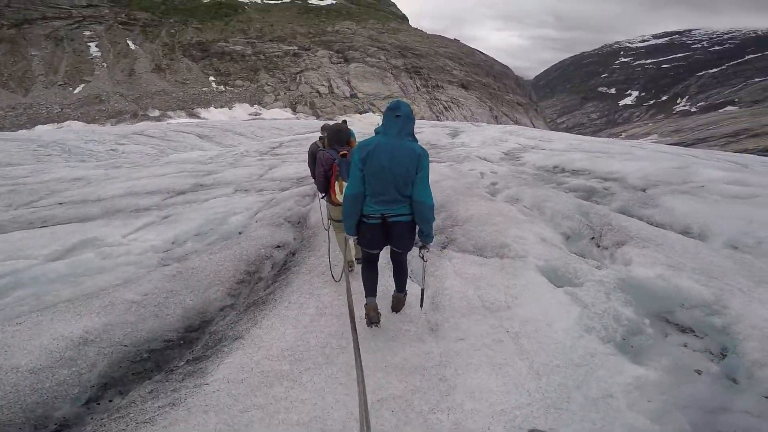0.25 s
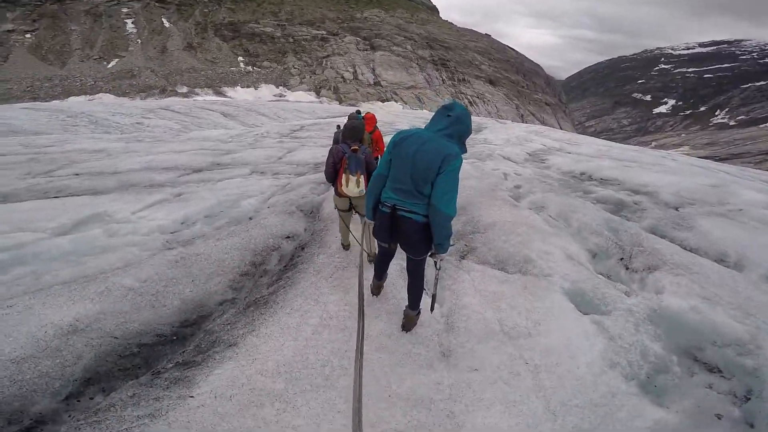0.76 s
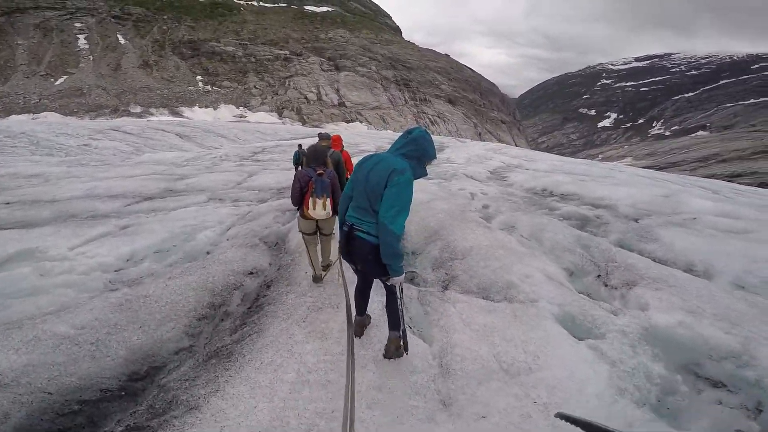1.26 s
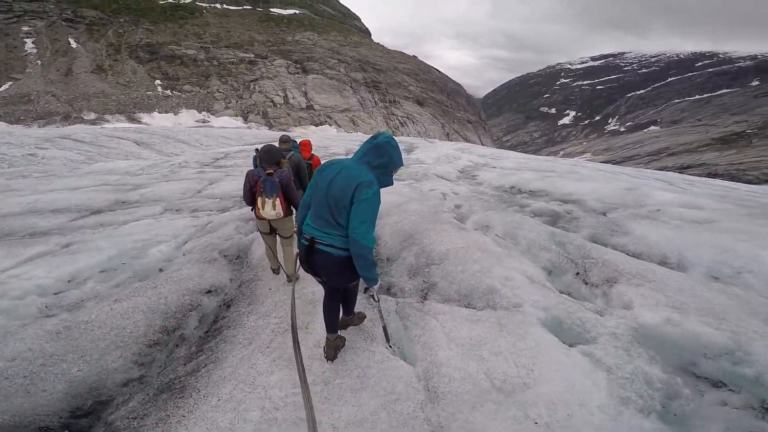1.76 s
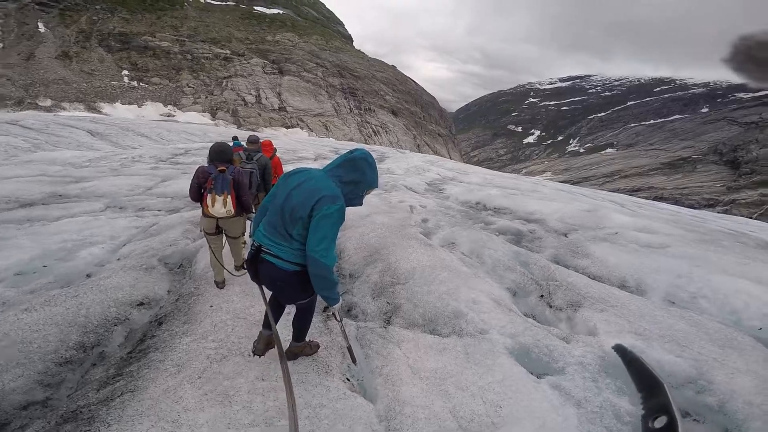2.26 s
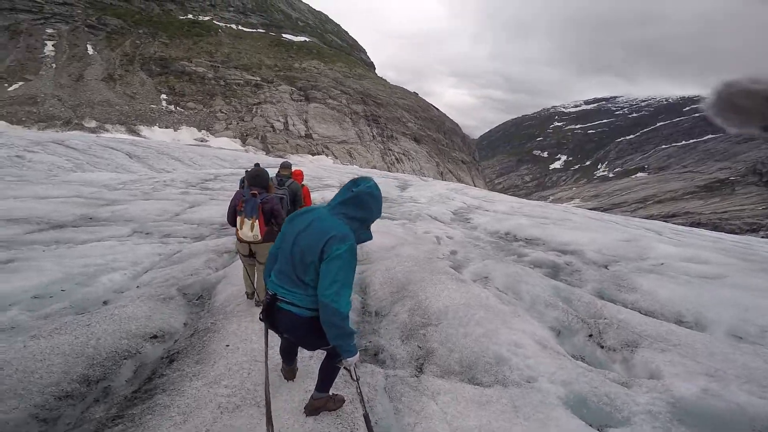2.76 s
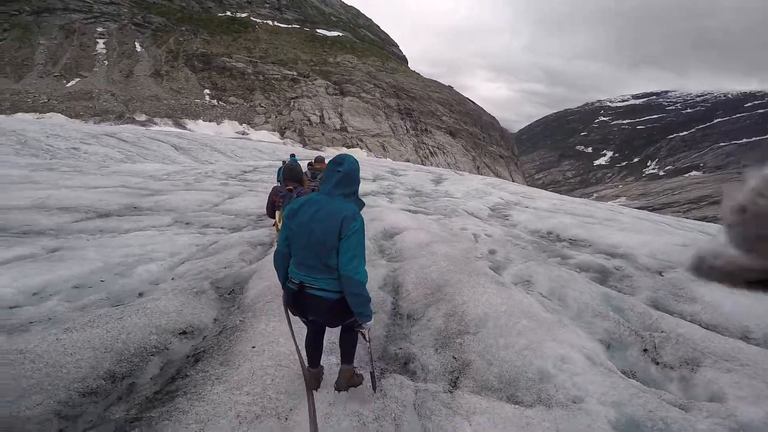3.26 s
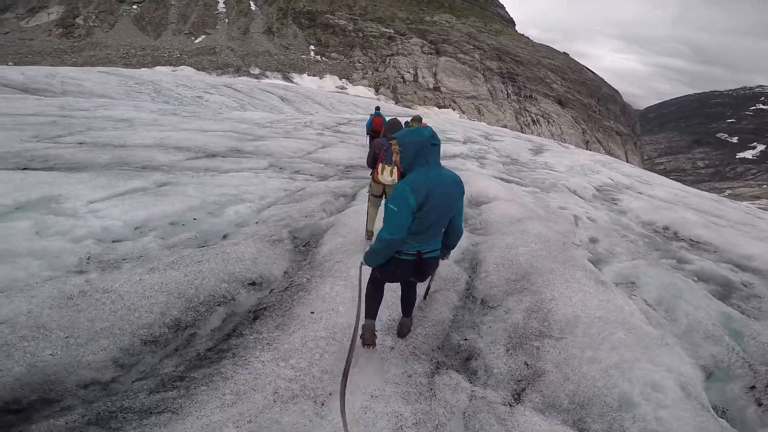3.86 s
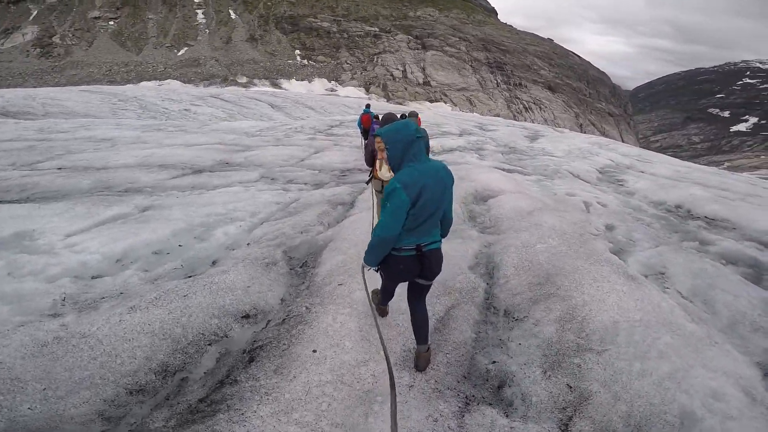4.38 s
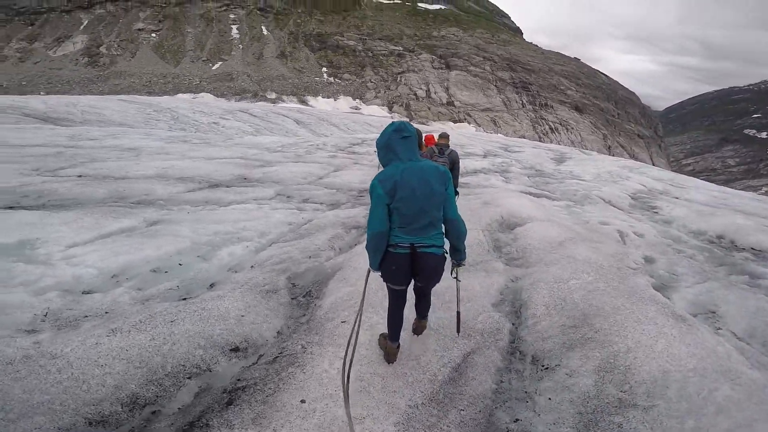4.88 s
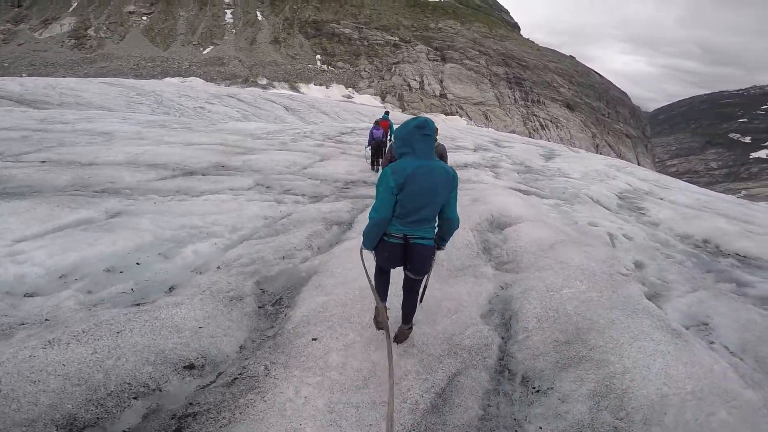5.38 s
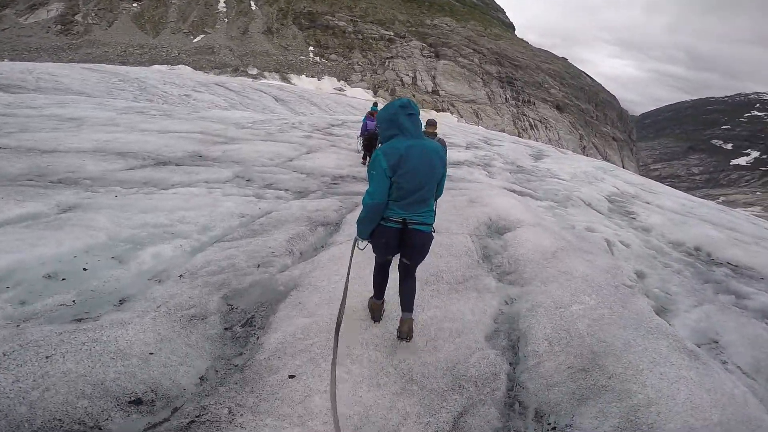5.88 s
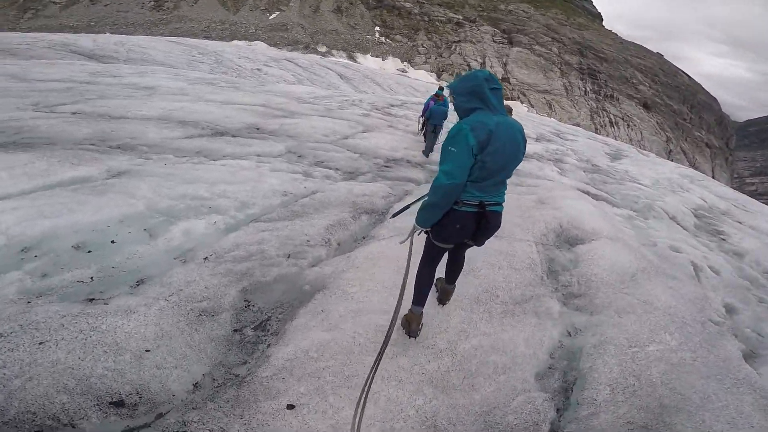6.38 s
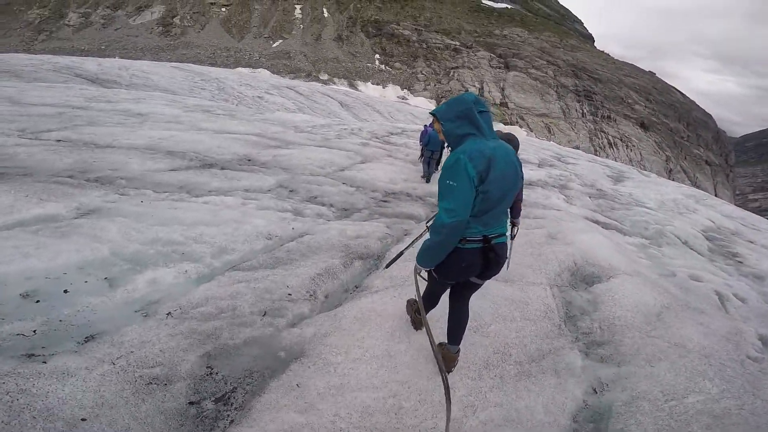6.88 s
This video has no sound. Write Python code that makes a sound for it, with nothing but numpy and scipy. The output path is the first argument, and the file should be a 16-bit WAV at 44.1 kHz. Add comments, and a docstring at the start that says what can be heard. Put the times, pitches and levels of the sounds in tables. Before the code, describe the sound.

A close, dry, single-channel sound on an open glacier, slightly muffled by a body-worn camera housing. From 0 to 1.8 s spiked boots bite bare ice in short, irregular, gritty crunches with tiny glassy snaps; a sharp click with a faint steel clink comes at 0.4 s, and a brief rub at 0.6. From 1.7 s a glove rubs the plastic, taps it at 1.83, and hits it at 2.07 with a very loud, distorted knock and low jolt, another tap following at 2.12. Hollow rubbing surges until about 2.7, fades, then flares with taps around 3.25. A faint rough squeak rises near 3.8. Uneven crunching continues to 7.1 s, with brighter snaps around 5.6 to 5.7 and thin steel scrapes around 4.8 and 6. Underneath lie soft wind buffets, small strap thuds, the uneven hiss of distant steps and dragging rope, and a barely audible high whine.

```python
"""Crampons on glacier ice

A roped party walks over bare ice, heard through the housing of a body-worn camera.
Spike bites are bursts of shaped noise grains with short decaying sines as crystal snaps.
A glove rubs (noise through resonances) and taps (damped sines), once hard enough to clip; straps
jolt the microphone (pulses), wind buffets it (low noise), steel clinks (modes) and slides (narrow hiss).
Behind: a brief squeak, the uneven hiss of far walkers and dragging rope, a faint steady whine."""
import sys
import numpy as np
from scipy import signal
from scipy.fft import rfft, irfft, next_fast_len
from scipy.io import wavfile
from scipy.ndimage import uniform_filter1d, map_coordinates

SR = 44100
rng = np.random.default_rng(int(sys.argv[2]) if len(sys.argv) > 2 else 0)


def transcribe(signal):
    """Save signal, clipped to [-1, 1], as a 16-bit WAV file at the path in sys.argv[1]."""
    frames = np.atleast_2d(signal).T
    limited = np.clip(frames, -1, 1)
    pcm = np.round(limited * 32767).astype(np.int16)
    wavfile.write(sys.argv[1], SR, pcm)


N = 314433
TIME_S = np.arange(N) / SR

# spike bites: t/s, length/s, body level/dB, treble over body/dB
BITES = [(0.041, 0.031, -47, -2), (0.11, 0.0081, -54.5, -0.5), (0.13, 0.066, -53.5, -3.5),
         (0.241, 0.071, -52, -6), (0.319, .014, -44.5, -3.5), (0.395, 0.006, -37, -12),
         (0.448, 0.045, -50.5, -8.5), (0.671, 0.013, -53.5, -13), (0.773, 0.057, -58.5, -5),
         (0.855, 0.023, -49.5, -9.5), (0.928, 0.072, -55.5, -7), (1.017, 0.053, -49, -4),
         (1.081, 0.0075, -44.5, -17), (1.128, 0.025, -52.5, -1), (1.159, 0.018, -46, -4.5),
         (1.18, 0.086, -55.5, -2.5), (1.307, 0.024, -56, -1), (1.333, 0.041, -48.5, -2.5),
         (1.655, 0.02, -57.5, -3), (1.684, 0.011, -49, 0), (1.704, 0.09, -57, -2), (1.811, 0.038, -52, 0),
         (2.716, .012, -60, -1), (2.741, .01, -62, 8), (2.993, .012, -60, 8), (3.039, 0.0088, -61, 6),
         (3.365, 0.0074, -57, -2), (3.383, .008, -56, 2), (3.47, 0.013, -61, 6), (3.492, 0.021, -55, 0),
         (3.548, 0.012, -43.5, -6), (3.599, 0.057, -56, -1), (3.664, .028, -46.5, -1.5),
         (3.75, 0.029, -57, 1), (3.819, 0.028, -57, 2), (3.906, 0.023, -54.5, 9), (3.986, 0.11, -55, -3.5),
         (4.133, 0.14, -56.5, -2.5), (4.26, 0.041, -50.5, -1.5), (4.363, 0.12, -55.5, -2.5),
         (4.553, 0.019, -62, 5.5), (4.603, 0.018, -61.5, 6), (4.783, .045, -61, 1),
         (4.834, 0.097, -54, -0.5), (4.967, .013, -49.5, -8.5), (5.056, .11, -58, 2),
         (5.175, 0.024, -53.5, -0.5), (5.28, .012, -56.5, 4.5), (5.513, 0.014, -58, 5.5),
         (5.54, 0.037, -57.5, 5), (5.579, 0.089, -47, -0.5), (5.674, 0.067, -49, -12),
         (5.762, 0.049, -55, 0), (5.889, 0.022, -56, 6), (5.958, 0.038, -53.5, 0), (6.047, 0.07, -55, -6),
         (6.12, 0.1, -55, -1), (6.201, 0.05, -47.5, 0.5), (6.253, 0.15, -64, 0), (6.367, 0.03, -52.5, -2),
         (6.513, 0.035, -62, 10), (6.839, 0.031, -54, 0), (6.878, 0.052, -47, -2.5),
         (6.917, 0.035, -58, -2), (6.954, 0.069, -47, -5.5), (7.029, .037, -54.5, -2),
         (7.074, .025, -61.5, 4), (7.1, 0.022, -58, 4)]
# ice spectra, body and treble: f/Hz, density/dB
ICE_BODY = [(350, -38), (600, -10.5), (729, -16), (861, -7.5), (1060, -1), (1340, -12.5), (1470, -3.5),
            (1740, -14), (1880, -9), (2200, 2.5), (2850, -0.5), (4130, -3.5), (4880, -23), (5500, -7),
            (7150, -48), (12100, -120)]
ICE_TREBLE = [(2350, -68), (4000, -0.5), (4940, 0.5), (5350, -1), (7710, 1.5), (9970, -4.5), (11000, -15.5),
              (12800, -7), (14600, -11), (15600, -9)]
# single crystals snapping: t/s, level/dB, f/Hz
CRYSTAL_SNAPS = [(0.3955, -43, 3030), (0.4833, -36, 2240), (1.054, -33.5, 3010), (1.0819, -36, 3150),
                 (1.1613, -51, 4250), (1.6876, -30, 3070), (3.6674, -32, 2770), (3.9113, -43, 5440),
                 (4.267, -37, 3810), (3.9961, -36.5, 2580), (4.0864, -39, 3870), (4.2385, -39, 2600),
                 (5.595, -32, 2340), (5.6518, -27.5, 4000), (5.7202, -27, 2070), (6.2026, -31, 2460),
                 (6.3133, -38, 2160), (6.5378, -48.5, 4510), (6.7508, -43, 2330), (7.0487, -43, 3650),
                 (7.103, -43, 3480)]
# steel dragged over ice: t/s, length/s, level/dB, ring index 0-2
STEEL_SLIDES = [(0.574, 0.17, -63, 0), (0.57, 0.073, -64, 2), (4.83, 0.23, -60, 0), (4.7, 0.36, -62, 2),
                (5.75, 0.1, -60, 0), (5.75, 0.23, -68, 2), (5.95, 0.34, -61.5, 0), (5.9, .35, -61, 1),
                (5.95, 0.2, -54, 2), (6.52, 0.35, -65, 0), (6.7, .16, -64.5, 2)]
# rings of dragged steel: f/Hz, width/Hz
SLIDE_RINGS = [(2230, 320), (2880, 330), (3860, 250)]

# glove strokes, one table a stroke: t/s, level/dB, treble over body/dB, lower share/dB, highest share/dB
GLOVE_STROKES = [
    [(0.568, -60, -4, -3, -3), (0.582, -45.5, -18, 0, -14), (0.596, -56, -8, -2, -9)],
    [(1.7, -56, 0, -1, -6), (1.708, -52, -2, -9, -2), (1.744, -51, -6, -2, -7), (1.77, -46, -8, -5, -3),
     (1.79, -56, -4, -1, -7), (1.8, -56, -2, -5, -1)],
    [(1.836, -40, -3, -7, -3), (1.844, -37.5, -6, -7, -13), (1.882, -24, -6, -3.5, -18),
     (1.91, -35, -12, -4.5, -5.5), (1.922, -32, -17, -3, -8), (1.942, -31, -15, -2.5, -23),
     (1.96, -52, -11, -3, -12)],
    [(1.96, -49, -8, 1, -14), (1.982, -48, -3, -4, -10), (1.994, -41, -13, -5, -17),
     (2.012, -32.5, -10, 0, -11), (2.026, -45, -10, -1, -13), (2.04, -44, -7, -5, -11),
     (2.058, -52, -14, -3, -11)],
    [(2.08, -37, -13, -1, -16), (2.116, -28, -13, -6, -10), (2.124, -18, -12, -4, -10),
     (2.138, -23, -15, -9, -13), (2.2, -25, -14, -8, -11), (2.326, -32, -10, -1.5, -8),
     (2.385, -45, -4, -8, -3)],
    [(2.385, -45, -11, -3, 1.5), (2.411, -34, -20, -4.5, -12), (2.441, -38.5, -16, -3, -8),
     (2.46, -69, -15, -2, -12)],
    [(2.508, -64, -9, -1, -6), (2.528, -39.5, -8, -2, -11), (2.562, -33.5, -6, -6, -4.5),
     (2.592, -37.5, -8, -6.5, -8), (2.662, -32, -7.5, -4, -3), (2.676, -47, -6, -2, -5),
     (2.682, -50, -9, -5, -9)],
    [(2.686, -47, -7, 0, -7), (2.7, -61, -8, -5, -14), (2.724, -50.5, -6, -2, -6), (2.73, -63, -7, -6, -5),
     (2.772, -41, -14, -0.5, -17), (2.81, -59, -6, -6, -6)],
    [(2.81, -60, -6, -8, -6), (2.818, -58, -9, -13, -11), (2.834, -41.5, -16, -0.5, -13),
     (2.852, -57, -2, -12, -11), (2.87, -57, -7, -6, -8)],
    [(2.87, -63, -6, -3, -7), (2.906, -42.5, -13, -12, -9), (2.974, -35, -15.5, -13, -9.5),
     (3.014, -58, 0, -6, -5), (3.05, -60, -3, -9, -8)],
    [(3.1, -56, -10, -8, -10), (3.136, -56, -3, -5, -8), (3.15, -37, -19, -4, -18),
     (3.156, -48, -6, -4, -6), (3.202, -39, -7, -1.5, -9), (3.226, -45, -1, 2, -3),
     (3.228, -35, -12, -5, -9)],
    [(3.234, -27, -24, -7, -9), (3.242, -31, -16, -7, -7), (3.26, -24.5, -14.5, -14, -6),
     (3.286, -27, -11, -17, -6), (3.304, -38, -6, -2, -10), (3.31, -48, -7, 3, -9)],
    [(3.31, -46, -3, 0, -12), (3.344, -49, -9, -0.5, -18), (3.362, -59, -4, -3, -4),
     (3.366, -50, -8, -0.5, -12), (3.436, -58.5, 4.5, 0, -11), (3.48, -49, -7, -8, -10)],
    [(5.712, -47, -10, -4, -13), (5.72, -37.5, -5, -4.5, -15), (5.732, -38.5, -19, 2, -18),
     (5.742, -47, -9, -1, -10)],
]
# glove treble spectrum: f/Hz, density/dB
GLOVE_TREBLE = [(2060, -65), (3500, 9.5), (4610, 5.5), (6080, -5.5), (6350, -1.5), (7150, -6),
                (8260, -13.5), (10500, -13), (11500, -9), (14700, -17), (15600, -16)]
# housing resonances, three groups: f/Hz, width/Hz, level/dB
HOUSING_LOWER = [(1443, 676, -1), (2257, 335, 0.5)]
HOUSING_UPPER = [(2390, 360, -1.2), (2430, 355, 1.7)]
HOUSING_HIGHEST = [(3150, 480, 2), (4250, 1100, -8)]
# taps on the housing: t/s, level/dB, ring f/Hz, contact/ms, crack over tap/dB
HOUSING_TAPS = [(0.3958, -28, 3010, 2.8, -17), (1.8287, -10.5, 2450, 1.56, -27),
                (1.9238, -29, 2160, 1.2, -29), (2.0099, -16.5, 1910, 0.74, -27), (2.0677, -19, 500, 1, -30),
                (2.0691, 15, 2683, 1.2, -6), (2.0699, -12, 2300, 3.6, -9), (2.099, -20, 2500, 0.46, -28.5),
                (2.1234, -30, 2520, 0.74, -23), (2.1247, -4.5, 2480, 0.93, -22),
                (2.829, -35.5, 2520, 1.1, -17), (3.1493, -27, 2460, 1.1, -19), (3.233, -13, 2320, 1.5, -38),
                (3.262, -12.5, 2340, 0.95, -22), (3.302, -21.5, 1700, 0.75, -18)]

# microphone jolts: t/s, level before the low pass/dB, push +1 or pull -1, width/ms
MIC_JOLTS = [(0.0453, -47, -1, 1.8), (0.2305, -27.5, -1, 1.8), (0.3292, -39, -1, 2.7),
             (0.406, -25.5, -1, 1.9), (0.4785, -30.5, -1, 1.2), (0.526, -34, -1, 2.1),
             (0.5823, -38.5, -1, 3.4), (0.9425, -32, -1, 3.6), (1.0055, -36, -1, 2.4), (1.0835, -30, -1, 1),
             (1.376, -35, 1, 4), (1.637, -34, 1, 2.9), (1.8507, -30, 1, 2.3), (2.069, -1, 1, 4.8),
             (2.124, -22, 1, 1.9), (2.3087, -24, 1, 0.79), (2.349, -32, -1, 4.4), (2.5065, -11.5, -1, 6.16),
             (2.8897, -21, -1, 6.2), (3.149, -26.5, -1, 4.8), (3.233, -25, 1, 3.1), (3.277, -27.5, -1, 3.4),
             (3.372, -22, 1, 5), (3.406, -26, 1, 5.6), (3.613, -33, 1, 5.7), (3.6846, -32.5, 1, 1.1),
             (3.943, -34.5, 1, 2.7), (4.432, -33.5, -1, 1.5), (4.5204, -36, 1, 4.2),
             (4.5584, -29.5, -1, 2.4), (4.6643, -32.5, 1, 3.1), (5.14, -33.5, 1, 2), (5.252, -32.5, 1, 2.8),
             (5.3626, -30.5, 1, 3.3), (5.619, -34.5, 1, 1.3), (5.646, -28.5, -1, 1.6),
             (5.695, -32, -1, 3.9), (5.7174, -42, -1, 2.2), (5.935, -35.5, 1, 3.4),
             (5.9888, -32.5, -1, 3.8), (6.2235, -32, 1, 1.4), (6.385, -32, -1, 1), (6.444, -34.5, 1, 3),
             (6.963, -32, 1, 0.92)]
# wind on the port: t/s, sway level/dB
WIND_SWAY = [(0.0, -45), (0.5, -39), (0.83, -49), (1.15, -41), (1.37, -47), (1.49, -39), (1.61, -47),
             (1.81, -41.5), (1.91, -28.5), (2.08, -21), (2.24, -34), (2.46, -43.5), (2.64, -36),
             (2.86, -43.5), (3.2, -32), (3.47, -40.5), (3.61, -32), (3.79, -45), (4.13, -43.5), (4.28, -33),
             (4.4, -43.5), (4.55, -51.5), (4.8, -51.5), (4.96, -33), (5.14, -43.5), (5.4, -55),
             (5.62, -39.5), (5.78, -28), (5.9, -48), (6.31, -38), (6.67, -55), (7.03, -34), (7.13, -46.5)]
# wind spectra, sway and flutter: f/Hz, density/dB
SWAY_SPECTRUM = [(8.8, -36.5), (15, 3.5), (29, -4.5), (36, -5), (54, -12.5), (110, -31.5), (140, -46),
                 (240, -120)]
FLUTTER_SPECTRUM = [(41, -25.5), (70, -0.5), (177, -7.5), (274, -5.5), (400, -7.5), (639, -26.5),
                    (800, -22.5), (1040, -54), (1760, -120)]

# steel gear touching: t/s, then the level/dB of each of four modes
STEEL_CLINKS = [(0.08, -68, -64, -70, -57), (0.3963, -53, -58, -42, -50), (1.15, -77, -67, -70, -44.5),
                (1.66, -70, -73, -52, -50)]
# steel modes: f/Hz, t60/s
STEEL_MODES = [(1674, 0.32), (2234, .3), (3042, 0.1), (4230, 0.15)]
# squeak path: t/s, f/Hz, level/dB
SQUEAK_PATH = [(3.76, 960, -75), (3.8, 1050, -62), (3.86, 1200, -67), (3.9, 1376, -58.5), (3.93, 1450, -75)]
# far walkers and dragging rope: t/s, body level/dB
FAR_LEVEL = [(0.0, -62.5), (0.6, -59.5), (0.79, -63.5), (1.16, -61.5), (1.66, -61), (1.75, -54.5),
             (3.45, -54.5), (3.78, -60), (4.28, -62.5), (4.81, -62.5), (5.29, -59.5), (5.55, -65),
             (5.7, -57), (6.1, -63), (6.33, -60), (7.13, -59.5)]
# far spectra, body and treble: f/Hz, density/dB
FAR_BODY = [(260, -41.5), (450, 0.5), (708, -10.5), (815, -8), (968, -5.5), (1210, -1.5), (1400, -5),
            (2140, -4.5), (2450, -3), (3440, -8), (3810, -5), (5000, -40), (6500, -67), (11000, -120)]
FAR_TREBLE = [(2470, -50.5), (4200, 4.5), (7050, -3), (7740, -3), (8400, -3.5), (11400, -8.5), (13100, -8),
              (14200, -10.5), (15600, -7.5)]
# faint whine, one row: f/Hz, width/Hz, level/dB
WHINE_BAND = (9550, 200, -83)

FIRST_SNAP_DB, SNAP_LOW_HZ, SNAP_HIGH_HZ = 4, 2160, 4360  # snap opening each bite, dB over its body
STRAY_PER_S, STRAY_MAX_DB = 41, -47.5  # faint snaps at random times
REBOUND_DB, REBOUND_DB_PER_MS, STIFF_MS = -6.5, 5, 3.4  # pushes wider than STIFF_MS rebound harder
FLUTTER_DB, FLUTTER_DB_PER_DB = -53.5, 0.25  # at mean sway; slope against sway
FAR_TREBLE_DB, FAR_TREBLE_DB_PER_DB = -65, 0.3  # at mean body level; slope against body
TOP_HZ = 15300


def amp(db):
    """Amplitude from dB."""
    return 10 ** (np.asarray(db) / 20)


def unit(x):
    """x scaled to rms 1."""
    return x / np.sqrt(np.mean(x ** 2) + 1e-20)


def curves(rows):
    """One value per sample for each column after the time."""
    t_s, *columns = np.transpose(rows)
    return [np.interp(TIME_S, t_s, column) for column in columns]


def wobble(rate_hz):
    """Smooth random curve with rate_hz knots a second."""
    knots = rng.standard_normal(int(N * rate_hz / SR) + 4)
    return map_coordinates(knots, [TIME_S * rate_hz])


def filtered(x, response):
    """x through a complex response of frequency in Hz."""
    m = next_fast_len(N + SR // 2)
    return irfft(rfft(x, m) * response(np.fft.rfftfreq(m, 1 / SR)), m)[:N]


def coloured(x, points):
    """x shaped by (Hz, dB) points on a log frequency axis, rms 1."""
    f_hz, db = np.transpose(points)
    return unit(filtered(x, lambda hz: amp(np.interp(np.log(hz + 1), np.log(f_hz + 1), db))))


def ringing(x, modes):
    """x through parallel resonances of alternating sign and a 900 Hz second-order low cut, rms 1."""
    def response(hz):
        bank = 0
        for k, (centre_hz, width_hz, db) in enumerate(modes):
            damping = 1j * hz * width_hz
            bank = bank + (-1) ** k * amp(db) * damping / (centre_hz ** 2 - hz ** 2 + damping)
        return bank * (1j * hz / (900 + 1j * hz)) ** 2
    return unit(filtered(x, response))


def grit(rate_hz, spread_db, noise, patchy_db):
    """Random spikes of scattered size over plain noise, in passing patches of colour."""
    hit, size = rng.random((2, N))
    spikes = (hit < rate_hz / SR) * amp(-spread_db * np.log(size + 0.019)) * rng.standard_normal(N)
    z = signal.stft(unit(spikes) + noise * rng.standard_normal(N), nperseg=256)[2]
    patches = uniform_filter1d(rng.standard_normal(z.shape), size=4, axis=0)
    patches = uniform_filter1d(patches, size=5, axis=1)
    return signal.istft(z * amp(patchy_db * unit(patches)), nperseg=256)[1][:N]


def bursts(start_s, length_s, db, edge_s, sag_db, release_s):
    """Gain of bursts that set in sharply, sag a little and die away fast."""
    gain = np.zeros(N)
    for s, span, level_db in zip(start_s, length_s, db):
        k = np.arange(round(s * SR), min(round((s + span) * SR), N))
        gain[k] = amp(level_db + sag_db * (s - k / SR) / span)
    keep = np.exp(-1 / (release_s * SR))
    gain = np.maximum(gain, signal.lfilter([1 - keep], [1, -keep], gain))
    return np.abs(uniform_filter1d(gain, max(round(edge_s * SR), 1)))


def crampons():
    """Each bite shatters ice crystals: dense grains, the same ones in body and treble."""
    s, span, body_db, treble_db = np.transpose(BITES)
    grains = grit(2500, spread_db=3.0, noise=0.65, patchy_db=1.84)
    grains = grains * amp(2.65 * wobble(120) + 1.12 * wobble(45))

    def loudness(db):
        return bursts(s, span, db, edge_s=0.0025, sag_db=1.5, release_s=0.0042)
    body = coloured(grains, ICE_BODY) * loudness(body_db)
    treble = coloured(grains, ICE_TREBLE) * loudness(body_db + treble_db)
    return body + treble


def snaps():
    """A crystal snap is a few rough cycles with a sub-millisecond rise, gone in milliseconds."""
    out, t = np.zeros(N + SR), TIME_S[:SR // 50]
    first = []
    for (s, _, db, _), u in zip(BITES, rng.random(len(BITES))):
        hz = SNAP_LOW_HZ * (SNAP_HIGH_HZ / SNAP_LOW_HZ) ** u
        first.append((s + 0.002, db + FIRST_SNAP_DB, hz))
    stray = [(a * N / SR, STRAY_MAX_DB - 9 * b, SNAP_LOW_HZ * 4.1 ** c)
             for a, b, c in rng.random((round(STRAY_PER_S * N / SR), 3))]
    rows = CRYSTAL_SNAPS + first + stray
    for (s, db, hz), noise in zip(rows, rng.standard_normal((len(rows), len(t) + 1))):
        fade = amp(db - 60 * t / 0.012) * (1 - np.exp(-t / 0.0004))
        out[round(s * SR):][:len(t)] += fade * (np.sin(2 * np.pi * hz * t) + 0.22 * np.diff(noise))
    return out[:N]


def glove():
    """Cloth slips over plastic in clumps and drives the housing's resonances."""
    clumps = amp(1.2 * wobble(200))
    slips = clumps * grit(5000, spread_db=1.5, noise=0.93, patchy_db=2.2)
    fine = clumps * grit(5000, spread_db=1.5, noise=0.93, patchy_db=2.2)
    lower = ringing(slips, HOUSING_LOWER)
    upper = ringing(slips, HOUSING_UPPER)
    highest = ringing(slips, HOUSING_HIGHEST)
    treble = coloured(fine, GLOVE_TREBLE)
    out = np.zeros(N)
    for rows in GLOVE_STROKES:
        db, treble_db, lower_db, highest_db = curves(rows)
        # upper group takes the remaining power, at least 5 %
        upper_power = np.clip(1 - amp(2 * lower_db) - amp(2 * highest_db), 0.05, 1)
        stroke = lower * amp(db + lower_db) + upper * amp(db + 10 * np.log10(upper_power))
        stroke += highest * amp(db + highest_db) + treble * amp(db + treble_db)
        on = 1.0 * (TIME_S > rows[0][0] - 0.002) * (TIME_S < rows[-1][0])
        out += uniform_filter1d(on, size=120) * stroke
    return out


def taps():
    """A tap drives two rings of the plastic during contact, under a bright crack; a thin part rings on."""
    out, t = np.zeros(N + SR), TIME_S[:SR // 20]
    for s, db, hz, contact_ms, crack_db in HOUSING_TAPS:
        u = t * 1000 / contact_ms
        contact = np.sqrt(np.abs(np.sin(np.pi * u))) * (u < 1)
        shape = contact + 0.029 * amp(-60 * t / 0.0028) * (u > 0.5)
        rings = np.sin(2 * np.pi * hz * t) + 0.41 * np.sin(2 * np.pi * 1.38 * hz * t)
        crack = np.convolve(rng.standard_normal(len(t)), [0.8, 0.3, -0.6], "same")
        thin = amp(-13.5 - 60 * t / 0.0048) * np.sin(2 * np.pi * 11700 * t)
        out[round(s * SR):][:len(t)] += amp(db) * (shape * rings + amp(crack_db) * (shape * crack + thin))
    return out[:N]


def jolts():
    """A push on the membrane, then a slower damped swing back; long pushes swing slower."""
    out, t = np.zeros(N + SR), TIME_S[:SR // 8]
    for s, db, sign, width_ms in MIC_JOLTS:
        rebound_db = REBOUND_DB + REBOUND_DB_PER_MS * max(width_ms - STIFF_MS, 0)
        u = t * 1000 / width_ms
        push = np.abs(np.sin(np.pi * u ** 0.88)) ** 1.36 * (u < 1)
        after = np.clip(u - 1, 0, None) / 2.51
        swing = amp(rebound_db - 9.6 * after) * np.sin(np.pi * after ** 0.91)
        out[round(s * SR):][:len(t)] += np.sign(sign) * amp(db) * (push - swing)
    return filtered(out[:N], lambda hz: 1 / (1 + 1j * hz / 700) ** 2)


def wind():
    """Slow sway of the membrane, with a flutter of small eddies on top."""
    sway_db, = curves(WIND_SWAY)
    flutter_db = FLUTTER_DB + FLUTTER_DB_PER_DB * (sway_db - sway_db.mean())
    sway = coloured(rng.standard_normal(N), SWAY_SPECTRUM)
    power = np.abs(uniform_filter1d(sway ** 2, size=3500))
    sway = sway / (power + 0.1) ** 0.31  # evens out the swings
    flutter = coloured(grit(300, spread_db=6.0, noise=1.0, patchy_db=1.5), FLUTTER_SPECTRUM)
    flutter = flutter * amp(3.6 * wobble(25))
    return amp(sway_db) * unit(sway) + amp(flutter_db) * unit(flutter)


def clink():
    """Each touch rings the modes of the steel at its own strengths."""
    out = np.zeros(N)
    for s, *mode_db in STEEL_CLINKS:
        t = np.clip(TIME_S - s, 0, None)
        for db, (hz, t60_s) in zip(mode_db, STEEL_MODES):
            out += amp(db - 60 * t / t60_s) * np.sin(2 * np.pi * hz * t)
    return out


def slides():
    """Dragged steel hisses unevenly in one of three narrow rings."""
    hisses = []
    for hz, width_hz in SLIDE_RINGS:
        narrow = ringing(rng.standard_normal(N), [(hz, width_hz, 0)])
        hisses.append(ringing(narrow, [(hz, 2 * width_hz, 0)]) * amp(2.8 * wobble(25)))
    out = np.zeros(N)
    for s, span, db, ring in STEEL_SLIDES:
        on = 1.0 * (TIME_S > s) * (TIME_S < s + span)
        out += amp(db) * uniform_filter1d(on, size=1800) * hisses[round(ring)]
    return out


def squeak():
    """A faint rough squeak slides upward: a sine with jittered pitch and level."""
    hz, db = curves(SQUEAK_PATH)
    on = (TIME_S > SQUEAK_PATH[0][0]) * (TIME_S < SQUEAK_PATH[-1][0])
    level = amp(db + 4.1 * wobble(70))
    cycles = np.cumsum(hz * (1 + 0.0384 * wobble(150))) / SR
    return on * level * np.sin(2 * np.pi * cycles)


def far_shuffle():
    """The rest of the party and its rope blur into an uneven hiss of dense grains."""
    body_db, = curves(FAR_LEVEL)
    treble_db = FAR_TREBLE_DB + FAR_TREBLE_DB_PER_DB * (body_db - body_db.mean()) + 0.72 * wobble(4.5)
    grains = grit(4000, spread_db=3.0, noise=1.5, patchy_db=2.5)
    uneven_db = 0.5 * wobble(15) + 0.71 * wobble(40)
    body = amp(body_db + uneven_db) * coloured(grains, FAR_BODY)
    treble = amp(treble_db + uneven_db) * coloured(grains, FAR_TREBLE)
    return body + treble


def whine():
    """A narrow band of noise at constant level."""
    hz, width_hz, db = WHINE_BAND
    band = filtered(rng.standard_normal(N), lambda f: np.exp(-((f - hz) / width_hz) ** 2))
    return amp(db) * unit(band)


def scene():
    """Sum of all sources, one channel."""
    ice = crampons() + snaps()
    housing = glove() + taps() + jolts() + wind()
    gear = clink() + slides() + squeak()
    return (ice + housing + gear + far_shuffle() + whine())[None]


def record(dry):
    """Peaks saturate towards 0.95; a steep low pass ends the band at TOP_HZ."""
    clipped = dry[0] / (1 + np.abs(dry[0] / 0.95) ** 8) ** (1 / 8)
    return filtered(clipped, lambda hz: 1 / (1 + (hz / TOP_HZ) ** 200))[None]


dry = scene()
out = record(dry)
transcribe(out)
```